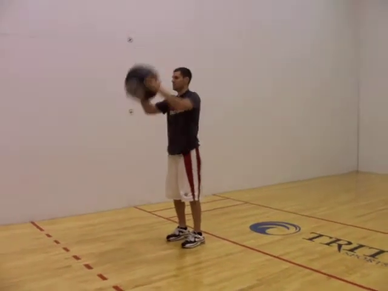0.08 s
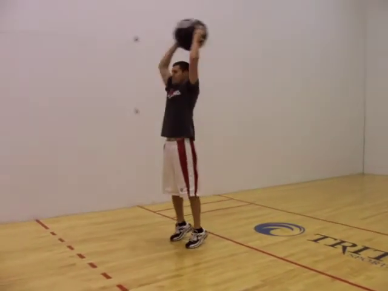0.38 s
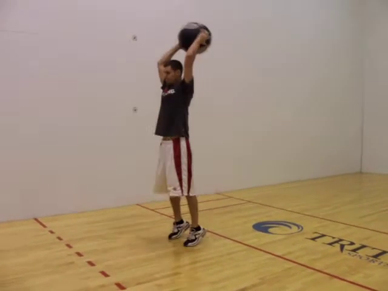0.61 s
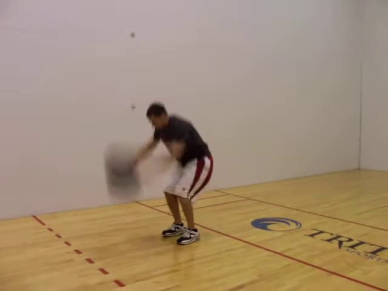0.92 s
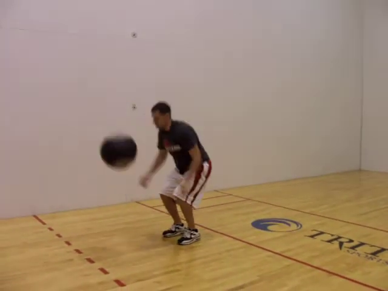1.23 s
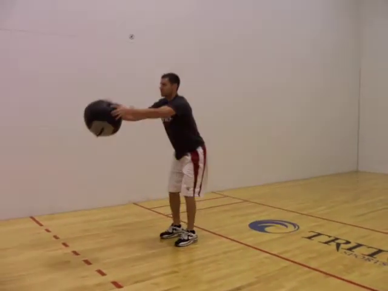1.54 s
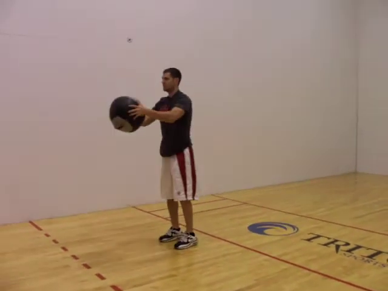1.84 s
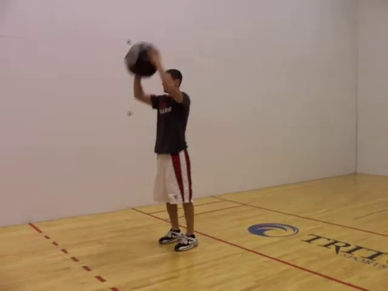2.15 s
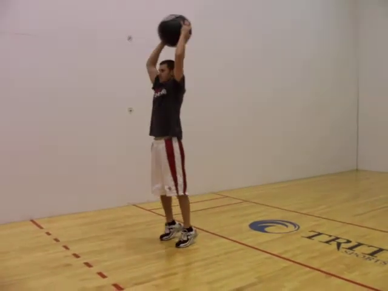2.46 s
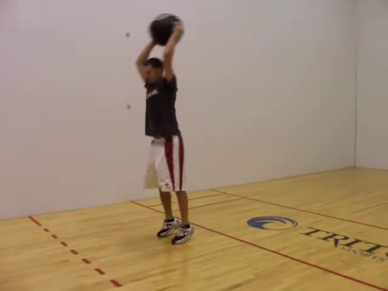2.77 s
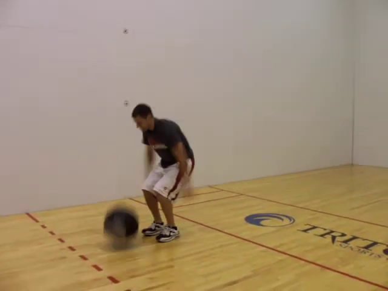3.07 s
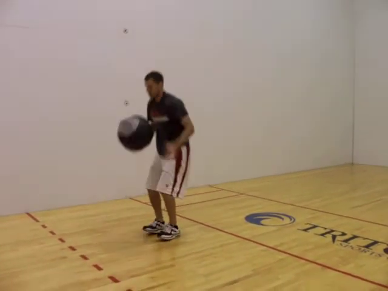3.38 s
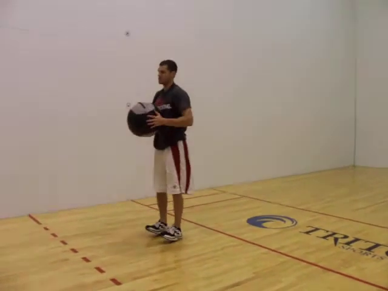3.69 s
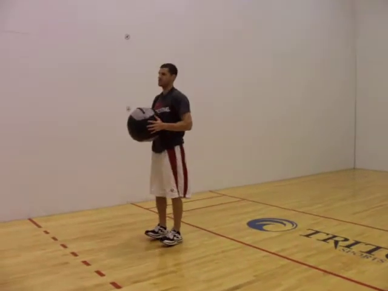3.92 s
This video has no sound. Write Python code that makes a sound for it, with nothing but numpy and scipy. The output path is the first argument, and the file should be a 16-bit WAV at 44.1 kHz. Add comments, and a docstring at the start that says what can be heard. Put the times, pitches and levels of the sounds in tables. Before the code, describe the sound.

A heavy medicine ball is slammed twice onto a wooden court floor, two seconds apart. Each slam is a quick double slap and thud that overloads the microphone, then echoes through the hall over steady ventilation noise.

```python
"""A heavy medicine ball is slammed twice, two seconds apart, onto the sprung wooden floor of a bare court.
Each slam is a double blow: the skin slaps, ball and boards thud, and near walls answer.
The very live hall, still ringing from an earlier throw, rings on for seconds over the ventilation.
The camera overloads on the blows; its gain control holds the dying, darkening tail nearly level."""
import sys
import numpy as np
from scipy import signal
from scipy.fft import rfft, irfft
from scipy.io import wavfile

SR = 44100
rng = np.random.default_rng(int(sys.argv[2]) if len(sys.argv) > 2 else 0)


def inscribe(sig):
    """Save sig as 16-bit PCM at rate SR to the path in sys.argv[1].

    A 1-D sig is mono; a 2-D sig holds one channel per row.
    Samples are clipped to [-1, 1] before scaling.
    """
    pcm = np.round(np.clip(np.atleast_2d(sig).T, -1, 1) * 32767)
    wavfile.write(sys.argv[1], SR, pcm.astype(np.int16))


N = 176400
TIME = np.arange(N) / SR
BIN_HZ = np.fft.rfftfreq(N, 1 / SR)


def from_db(db):
    """Decibels to gain."""
    return 10 ** (np.asarray(db) / 20)


def unit_rms(x):
    """Scale to an rms of 1."""
    return x / np.sqrt(np.mean(x ** 2) + 1e-20)


def at_hz(table, hz, column=1):
    """Read a column of a table on a log-frequency axis."""
    table = np.array(table)
    return np.interp(np.log(hz + 1e-9), np.log(table[:, 0]), table[:, column])


def cut(x, hz, kind, order=2):
    """Butterworth low- or high-pass."""
    return signal.sosfilt(signal.butter(order, hz, kind, fs=SR, output="sos"), x + 1e-18)


def smooth(x, seconds):
    """One-pole average."""
    pole = np.exp(-1 / (seconds * SR))
    return signal.lfilter([1 - pole], [1, -pole], x, zi=[pole * x[0]])[0]


def decay(start, t60):
    """Envelope that jumps to 1 and falls 60 dB in t60 seconds."""
    envelope = np.zeros(N)
    live = (TIME >= start) & (TIME < start + 2 * t60)
    envelope[live] = from_db(-60 * (TIME[live] - start) / t60)
    return envelope


def noise(spectrum):
    """Noise of the given colour, rms 1."""
    white = rfft(rng.standard_normal(N))
    return unit_rms(irfft(white * from_db(at_hz(spectrum, BIN_HZ)), N))


# The colour of the room tone. Each row: frequency in Hz, relative level in dB.
VENT_SPECTRUM = [(30, -23.5), (60, -21), (100, -14.5), (145, -26), (200, -11), (235, -11.5), (310, -5),
                 (385, -8), (480, -6.5), (730, 0.5), (870, -9.5), (1030, -13.5), (1200, -12.5),
                 (1750, -11.5), (2050, -12), (2400, -9.5), (2750, -10.5), (3150, -24), (4500, -31.5),
                 (6500, -52.5)]


def ventilation(level_db=-28.5):
    """Moving air lays a steady bed of noise under the scene."""
    return from_db(level_db) * noise(VENT_SPECTRUM)


# The hall's reverb tail. Each row: frequency in Hz, relative level in dB, 60 dB decay time in seconds.
HALL_TAIL = [(30, -15, 2.2), (70.4, -1, 1.9), (102, -10, 2.0), (129, -17, 2.3), (167, -4, 1.95),
             (217, -2, 2.85), (310, -1.5, 3.75), (360, -10, 3.46), (483, -10, 8.5), (720, -4.5, 2.9),
             (880, -11.5, 4.0), (1050, -12, 4.8), (1420, -15, 3.65), (2530, -12, 3.73), (3200, -18, 4.67),
             (4280, -16, 2.75), (5080, -15.5, 2.16), (6400, -21.5, 1.9)]


def hall_reverb(bangs, boom_build_s=0.061, wash_build_s=0.094, crossover_hz=530):
    """Each bang fills the court with a low boom and a bright wash; the mids ring longest."""
    earlier_throw = (-0.96, -22.5, -14, 1050)  # start in s, boom in dB, wash in dB, notch in Hz
    rings = [(bang[0], *bang[-3:]) for bang in bangs] + [earlier_throw]
    start, boom_db, wash_db, notch_hz = np.transpose(rings)[:, :, None]
    control_time = TIME[::SR // 1000]
    age = np.maximum(control_time - start, 0)
    boom = from_db(boom_db) ** 2 * (1 - np.exp(-age / boom_build_s))
    wash = from_db(wash_db) ** 2 * (1 - np.exp(-age / wash_build_s))
    diffuse = rfft(noise(HALL_TAIL))
    edges_hz = np.geomspace(25, 7500, 61)
    out = 0
    for low, high in zip(edges_hz, edges_hz[1:]):
        centre = np.sqrt(low * high)
        bass_share = 1 / (1 + (centre / crossover_hz) ** 6)
        octaves_off = np.log2(centre / notch_hz)
        notch = from_db(-15.5 * np.exp(-(octaves_off / 0.11) ** 2))  # hollows out each ring
        fade = from_db(-60 * age / at_hz(HALL_TAIL, centre, column=2))
        energy = (bass_share * boom + (1 - bass_share) * wash) * (notch * fade) ** 2
        envelope = np.interp(TIME, control_time, np.sqrt(energy.sum(axis=0)))
        band = irfft(diffuse * (BIN_HZ >= low) * (BIN_HZ < high), N)
        out += envelope * band
    return out


# Early reflections. Each row: delay in seconds, slap level in dB, thud level in dB, smear in seconds.
NEAR_WALLS = [(0.0102, -4.5, -13.5, 0.00073), (0.03, -11, -29, 0.015)]


def wall_echoes(slaps, thuds):
    """The nearest walls throw each bang back, scattering its crack into a short smear."""
    smear_time = TIME[:SR // 20]
    out = 0
    for delay, slap_db, thud_db, smear_s in NEAR_WALLS:
        smear = rng.standard_normal(len(smear_time)) * np.exp(-smear_time / smear_s)
        cracks = signal.fftconvolve(slaps, smear / np.linalg.norm(smear))[:N]
        echo = from_db(slap_db) * cracks + from_db(thud_db) * thuds
        out += np.interp(TIME - delay, TIME, echo)
    return out


# The woody knock. Each row: frequency in Hz, relative level in dB, 60 dB decay time in seconds.
KNOCK_MODES = [(502, -7, 0.09), (576.5, -1, 0.073), (669, -7, 0.073)]


def board_knock(start):
    """The struck floorboards ring at their own pitches."""
    phase = 2 * np.pi * (TIME - start)
    return sum(from_db(db) * decay(start, t60) * np.sin(hz * phase) for hz, db, t60 in KNOCK_MODES)


# The thud's body. Each row: multiple of its pitch, relative level in dB, 60 dB decay time in seconds.
BODY_MODES = [(.27, -19.5, .12), (.4, -18, .14), (.66, -17, 0.13), (.8, -14, 0.083), (1, -3.5, .055),
              (1.219, -9.5, 0.083), (1.7, -10.5, 0.05)]


def ball_thud(start, pitch_hz, squash_s=0.0037):
    """Ball and boards ring briefly together, reaching full strength as the ball flattens."""
    age = np.maximum(TIME - start, 0)
    squash = 1 - np.exp(-age / squash_s)
    phase = 2 * np.pi * pitch_hz * age
    body = sum(from_db(db) * decay(start, t60) * np.sin(ratio * phase) for ratio, db, t60 in BODY_MODES)
    return squash * body


def skin_slap(start, bright_hz):
    """The skin smacks the boards: a short crack, brighter when it lands flat."""
    crack = cut(rng.standard_normal(N), bright_hz, "low")
    crack = cut(crack, hz=347, kind="high", order=1)
    return decay(start, t60=0.022) * unit_rms(crack)


# The ball's hits, each slam a quick cluster of them. Each row: start in seconds, thud level in dB, thud pitch
# in Hz, knock level in dB, slap level in dB, slap brightness in Hz, hall boom in dB, hall wash in dB, notch in
# the tail in Hz.
BANGS = [(1.0155, -15, 289, -38, -33, 4890, -41.5, -44.5, 870),
         (1.0338, -6.5, 188, -22.5, -19, 1690, -17, -31.5, 850),
         (1.1123, 11.5, 237.7, -2.5, 1.5, 4500, -13.5, -13, 867),
         (3.0943, -5, 272, -9.5, -8.5, 2200, -22, -29, 501),
         (3.1300, -12, 295, -17.5, -17.5, 4470, -33.5, -32.5, 517),
         (3.1637, -3, 296, -15.5, -40, 1980, -45.5, -35.5, 520),
         (3.1742, -5, 263, -14.5, -3.5, 7000, -18, -15, 503)]


def ball_slams():
    """The ball's hits, in two layers: slaps, and thuds with board knocks."""
    slaps, thuds = np.zeros((2, N))
    for start, thud_db, pitch_hz, knock_db, slap_db, bright_hz, *_ in BANGS:
        slaps += from_db(slap_db) * skin_slap(start, bright_hz)
        thuds += from_db(thud_db) * ball_thud(start, pitch_hz)
        thuds += from_db(knock_db) * board_knock(start)
    return slaps, thuds


def scene():
    """The mono mix: room tone, reverb, wall echoes and the slams."""
    slaps, thuds = ball_slams()
    room = ventilation() + wall_echoes(slaps, thuds) + hall_reverb(BANGS)
    return (room + slaps + thuds)[None]


def gain_control(x, target_db=-18.5, strength=0.88, response_s=0.027, late_s=0.0016):
    """Rides the level above the bass toward a target; the front of each bang slips through first."""
    run_in = SR // 10
    sidechain = cut(np.pad(x, (run_in, 0), "reflect"), hz=300, kind="high")
    power = smooth(sidechain ** 2, seconds=0.0013)
    level_db = smooth(10 * np.log10(power + 1e-9), response_s)[run_in:]
    late_db = np.interp(TIME - late_s, TIME, level_db)
    return x * from_db(strength * (target_db - late_db))


def record(dry, overload=0.65, ceiling=0.72, band_edge_hz=6010, top_cut_hz=17000):
    """The camera's chain: bass cut, gain control, overload, steep low-pass, second clip, top cut."""
    x = cut(dry[0], hz=46, kind="high", order=3)
    x = np.clip(gain_control(x), -overload, overload)
    low_pass = signal.firwin(111, band_edge_hz, window="blackman", fs=SR)
    x = np.clip(np.convolve(x, low_pass, "same"), -ceiling, ceiling)  # shaves the filter's overshoots
    top_cut = signal.cheby2(12, 70, top_cut_hz, fs=SR, output="sos")
    return signal.sosfilt(top_cut, x)[None]


dry = scene()
out = record(dry)
inscribe(out)
```